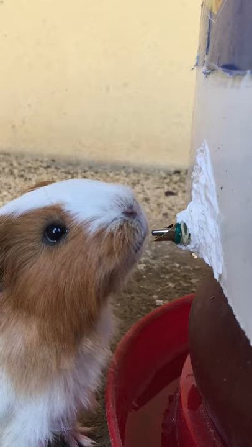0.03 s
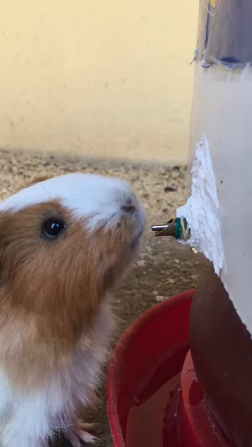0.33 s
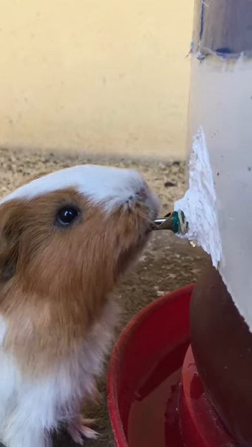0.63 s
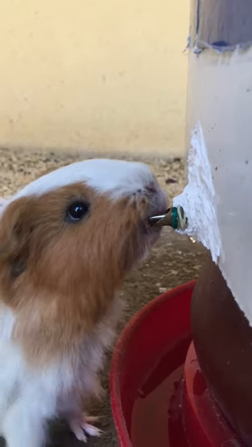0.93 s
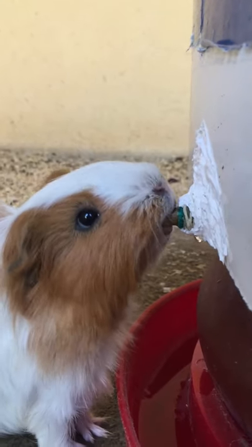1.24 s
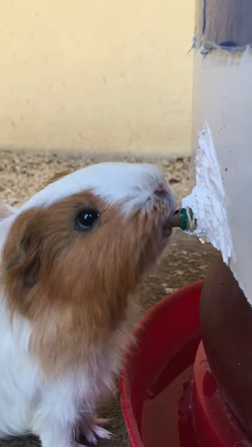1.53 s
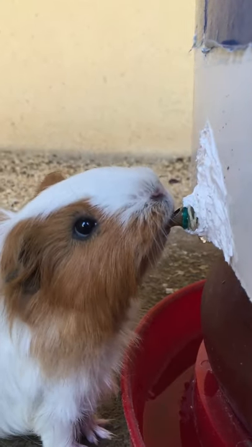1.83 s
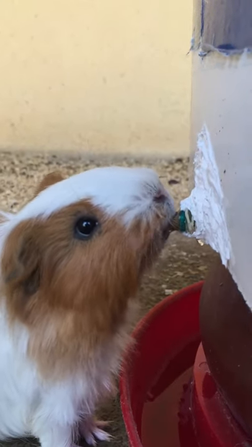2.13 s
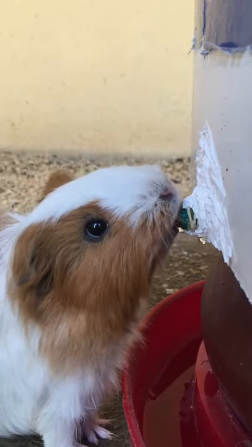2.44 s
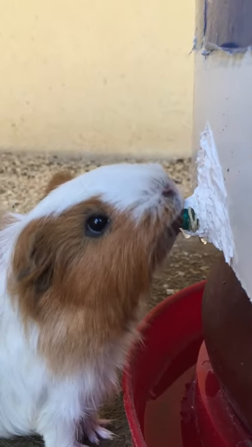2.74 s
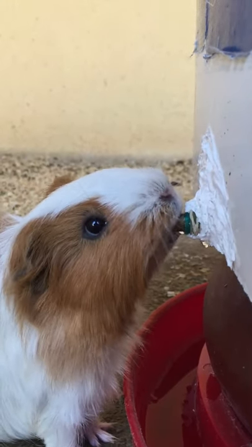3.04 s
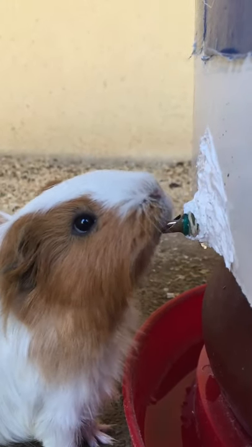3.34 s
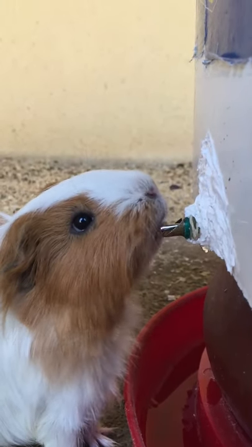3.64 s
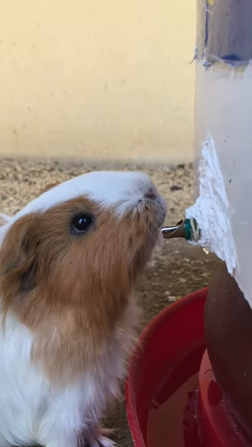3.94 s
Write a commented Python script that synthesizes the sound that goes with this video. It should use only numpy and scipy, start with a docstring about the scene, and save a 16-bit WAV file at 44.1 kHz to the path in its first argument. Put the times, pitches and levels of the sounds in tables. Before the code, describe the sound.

A guinea pig drinks from a metal nozzle, close up. For the first second there is only a low room rumble and wavering hum. From about 1.2 seconds come sharp, high clicks, roughly five a second, with faint wet lip smacks and thin, mostly rising squeaks. From 2 seconds, the plastic pipe thumps more strongly. The squeaks end near 3 seconds, the clicks at 3.4, and the rumble remains.

```python
"""A guinea pig drinks from a metal nozzle set in a plastic pipe, close to the microphone.
First a steady low rumble and a wavering drone sound alone. After a second, thin animal squeaks, mostly
rising, begin in the room, and the drinking starts: at each bite the valve pin strikes the nozzle with
a high click and the wet lips smack. From about two seconds on, harder bites drive the pipe's low mode
into stronger thumps. The squeaks end near three seconds, the bites soon after, and the rumble remains."""
import sys
import numpy as np
from scipy import signal
from scipy.fft import rfft, irfft
from scipy.io import wavfile
from scipy.ndimage import uniform_filter1d

SR = 44100
rng = np.random.default_rng(int(sys.argv[2]) if len(sys.argv) > 2 else 0)


def dump_mix(stems):
    """Bounce the given channels to the path in sys.argv[1] as a 16-bit WAV at rate SR."""
    frames = np.atleast_2d(stems).T  # one column per channel
    limited = np.clip(frames, -1, 1)  # hard clip at full scale
    pcm = np.round(limited * 32767).astype(np.int16)
    wavfile.write(sys.argv[1], SR, pcm)


N = 176400
CUTOFF_HZ = 16200

# Bites on the nozzle, each level relative within its column: time_s, thump_db, thump_hz, knock_db, smack_db
BITES = [(1.168, -41, 194, -50.5, -72), (1.353, -34.5, 203, -70, -63.5), (1.497, -54, 196, -49, -65),
         (1.856, -31.5, 213, -48, -77), (2.061, -29, 202, -49.5, -69), (2.286, -34.5, 208, -52, -74),
         (2.488, -34, 190, -53, -69), (2.684, -23, 198, -46.5, -68), (2.862, -25.5, 204, -53, -70),
         (3.045, -32, 192, -51.5, -73), (3.193, -33, 191, -61, -80), (3.247, -30.5, 206, -45.5, -65.5),
         (3.372, -32.5, 188.9, -51.5, -72)]


def valve_clicks():
    """Impact excitation: the pin strikes the nozzle and rattles, driving a damped ring and a broad tick."""
    # Pin impacts: start_s, level_db, ring_hz, half_width_hz, tick_db (against the ring)
    clicks = [(1.1583, -24.5, 12300, 3000, -2), (1.1657, -27.5, 8850, 2500, -10),
              (1.178, -34, 8500, 3500, -2), (1.3537, -19, 8740, 1200, -10), (1.3536, -27, 12500, 1400, -16),
              (1.3615, -36, 7800, 2500, -8), (1.498, -10.5, 12200, 1400, -11),
              (1.502, -20, 10300, 2200, -11), (1.677, -19, 14400, 2000, -5), (1.686, -21, 11900, 1500, -7),
              (1.859, -16, 12100, 1000, -22), (2.063, -25, 13600, 2000, -2), (2.069, -27, 13000, 3000, 2),
              (2.284, -24.5, 14900, 1800, -16), (2.487, 0, 14250, 1300, -34), (2.6771, -27, 9280, 2600, -7),
              (2.6841, -16, 9700, 1500, -10), (2.6882, -32, 9040, 3000, -8), (2.847, -30, 14600, 1400, -14),
              (2.859, -6.5, 9660, 1290, -10), (3.0376, -16, 14500, 1600, -17),
              (3.0433, -22, 10230, 1200, -6), (3.191, -20.5, 14800, 1700, -17),
              (3.1939, -32, 13000, 1400, -18), (3.2467, -24.5, 13960, 3010, -6),
              (3.276, -32, 14200, 2000, -12), (3.3667, -36, 11000, 3000, 1)]
    # Spectrum of the broad tick: frequency_hz, gain_db
    tick_spectrum = [(1000, -15), (2500, -22), (5000, -34), (7000, -6), (9500, -26), (12500, 1),
                     (15000, -3), (17000, -26)]
    rattle_decay_s, rattle_db = 0.0012, -8.5
    out, hz, t = np.zeros(N), np.fft.rfftfreq(1024, 1 / SR), np.arange(512) / SR
    for start_s, level_db, ring_hz, half_width_hz, tick_db in clicks:
        ring = 1 / (1 + ((hz - ring_hz) / half_width_hz) ** 2)
        tick = amp(tick_db + at_frequency(tick_spectrum, hz))
        contact = rng.standard_normal(len(t)) * np.exp(-t / rattle_decay_s) * (1 - np.exp(-t / 0.000074))
        contact *= amp(rattle_db) / np.linalg.norm(contact)
        contact[np.argmin(abs(t - .0002))] += 1  # the strike itself
        add(out, start_s, amp(level_db) * np.convolve(contact, minimum_phase(np.hypot(ring, tick))))
    return out + amp(-18) * reverberation(out)


def pipe_thumps():
    """Free damped vibration: after a bite the pipe's low mode thumps and its upper modes knock."""
    # Upper modes of the pipe: frequency_hz, gain_db, t60_s
    modes = [(408, -1.5, 0.046), (1060, 1, 0.082), (1280, -3, 0.015), (1646, 8.5, 0.013), (2204, -11, 0.12),
             (2790, -16.5, 0.01), (3700, -9, 0.019)]
    thump_rise_s, thump_t60_s = 0.004, 0.066
    out, t = np.zeros(N), np.arange(SR // 4) / SR
    for start_s, thump_db, thump_hz, knock_db, _ in BITES:
        envelope = (1 - np.exp(-t / thump_rise_s)) * amp(thump_db + 4.5 - 60 * t / thump_t60_s)
        sound = -np.sin(2 * np.pi * thump_hz * t) * envelope
        for mode_hz, gain_db, t60_s in modes:
            detuned_hz = mode_hz * (1 + 0.077 * rng.standard_normal())
            sound += amp(knock_db + gain_db - 60 * t / t60_s) * np.sin(2 * np.pi * detuned_hz * t)
        add(out, start_s, sound)
    return out + amp(-11.5) * reverberation(out)


def lip_smacks():
    """Shot noise: the wet lips give a fizz of tiny impulses that swells and fades around each bite."""
    # Spectrum of the fizz: frequency_hz, gain_db
    spectrum = [(2000, -20), (5000, -1), (8500, 5), (12000, 2), (16000, -20)]
    fade_s, grains_per_s = 0.019, 5000
    t, hz = np.arange(N) / SR, np.fft.rfftfreq(N, 1 / SR)
    envelope = sum(amp(smack_db) * np.exp(-abs(t - time_s) / fade_s) for time_s, *_, smack_db in BITES)
    grains = rng.standard_normal(N) * (rng.random(N) < grains_per_s / SR)
    return envelope * coloured(grains, amp(at_frequency(spectrum, hz)))


def squeaks():
    """Source and filter: the throat colours a whistle's overtones; hoarseness adds jitter and rasp."""
    # Calls: bright_db (overtone strength), then a contour of time_s, pitch_hz, level_db, roughness (0-1)
    calls = [ (-17, [(1.058, 2500, -56.5, 0.62), (1.095, 2850, -59.5, 0.26), (1.112, 2800, -69, 0.2)]),
             (-17, [(1.108, 2360, -55, 0.05), (1.12, 2480, -52, 0), (1.128, 2480, -70, 0.1),
             (1.147, 2430, -67, 0.14), (1.184, 2514, -60, .15)]), (-13, [(1.222, 3070, -54.5, 0.17),
             (1.25, 3373, -52, 0.04), (1.28, 3328, -49, 0), (1.312, 3263, -60, 0.2),
             (1.34, 3320, -72, 0.1)]), (-28, [(1.242, 6740, -66, 0.03), (1.258, 6800, -65, 0),
             (1.268, 6530, -78, 0.1), (1.276, 5900, -70, 0.15), (1.287, 5640, -69, 0.1)]),
             (-30, [(1.485, 1600, -52, 0.1), (1.515, 1652, -52, 0)]), (-8.5, [(1.535, 1896, -53, 0.15),
             (1.55, 2230, -52, 0.2), (1.562, 2495, -49, 0.1), (1.585, 2630, -62, 0.14),
             (1.605, 2610, -60, 0.2)]), (-8, [(1.595, 2980, -56, 0.05), (1.632, 3243, -38.5, 0.27),
             (1.66, 3630, -44, 0.7), (1.69, 3520, -75, 0.5)]), (-6, [(1.638, 4000, -48, 0.8),
             (1.656, 4500, -54, 0.15), (1.68, 4620, -54, 0.2), (1.693, 4760, -44.5, 0),
             (1.712, 4760, -42.5, 0.08), (1.725, 5130, -58, .02), (1.745, 5080, -49, 0.02),
             (1.765, 5130, -78, .03)]), (3, [(1.837, 2133, -51, 0.05), (1.856, 2110, -47.5, 0),
             (1.878, 2190, -46.5, 0.1), (1.897, 2293, -47.5, 0), (1.928, 2330, -48.5, 0.02),
             (1.942, 2444, -43.5, 0), (1.968, 2484, -42.5, 0.09), (1.995, 2633, -44, 0.13)]),
             (1, [(1.993, 2650, -44, 0.14), (2.01, 2823, -42.5, 0.6), (2.035, 2880, -50.5, 0.24),
             (2.052, 2912, -49.5, 0.15), (2.086, 2814, -55, 0.03)]), (-11, [(2.13, 1242, -52, 0.1),
             (2.18, 1632, -59, 0.84), (2.215, 2150, -55, 0.51), (2.23, 2420, -53.5, 0.15),
             (2.243, 2597, -60, 0.44), (2.258, 2950, -46, 0.32), (2.27, 2980, -64, 0.5)]),
             (-10, [(2.40, 2520, -63, 0.35), (2.435, 2298, -54, 0.42), (2.46, 2463, -69, 0.8),
             (2.485, 2920, -54.5, 0.24), (2.505, 3125, -67, 0.1)]), (-13, [(2.89, 1604, -67, 0.45),
             (2.95, 2054, -57, 0.5), (2.99, 2200, -64, 0.55)]), (-19, [(2.52, 3170, -64, 0.24),
             (2.57, 3084, -68.5, 0.63), (3.08, 2950, -72, 0.67)])]
    # Response of the throat: frequency_hz, gain_db
    throat = [(1300, 11), (2150, 4.5), (2550, 8.5), (3300, 12.5), (4300, -8.5), (4750, -15), (5200, -15),
              (6400, -16), (7450, -15), (8400, -15), (9000, -5.5), (9900, -7.5), (10500, -22), (11400, -15),
              (12400, -14), (13400, -23), (14200, -17), (14700, -33)]
    rasp_db, rasp_from_hz, tilt_db_per_octave = -14, 5000, -1
    out, f = np.zeros(N), np.fft.rfftfreq(N, 1 / SR)
    hiss = coloured(rng.standard_normal(N), amp(at_frequency(throat, f) / 2) * (f > rasp_from_hz))
    for bright_db, contour in calls:
        times, *columns = np.transpose(contour)
        t = np.arange(times[0], times[-1], 1 / SR)
        pitch_hz, level_db, roughness = (np.interp(t, times, column) for column in columns)
        jitter = (0.002 + 0.08 * roughness) * wander(len(t), hz=533)
        phase = 2 * np.pi * np.cumsum(pitch_hz * (1 + jitter)) / SR
        rasp = amp(bright_db + rasp_db) * np.sqrt(roughness) * hiss[round(t[0] * SR):][:len(t)]
        voice = np.sin(phase) + rasp
        for k in range(2, 8):
            throat_db = at_frequency(throat, k * pitch_hz) - at_frequency(throat, pitch_hz)
            overtone_db = bright_db + throat_db + tilt_db_per_octave * np.log2(k) + 5 * roughness
            # each overtone flutters in level and phase
            flutter = unit(1 + 0.7 * (wander(len(t), hz=80) + 1j * wander(len(t), hz=80)))
            overtone = (flutter * np.exp(1j * k * phase)).imag
            voice += (k * pitch_hz < CUTOFF_HZ) * amp(overtone_db) * overtone
        fades = np.clip(np.minimum(t - t[0], t[-1] - t) / 0.0041, 0, 1)
        shimmer = 1 + 0.5 * roughness * wander(len(t), hz=200)
        add(out, t[0], voice * fades * amp(level_db) * shimmer)
    return out + amp(-2.5) * reverberation(out)


def rumble():
    """Filtered noise: a bass-heavy spectrum, slightly uneven over time and frequency."""
    # Spectral shape of the rumble: frequency_hz, gain_db
    spectrum = [(15, -50), (25, -24), (43, -4), (77, -6.5), (96, -4), (168, -5.5), (187, -9.5), (222, -7.5),
                (255, -12), (328, -11.5), (434, -21), (513, -16.5), (624, -22), (897, -17.5), (1190, -19.5),
                (1810, -30), (3250, -40.5), (4940, -47.5), (6010, -48.5), (16000, -56)]
    level_db, patch_db = -44, 2.0
    cells = signal.stft(rng.standard_normal(N), SR, nperseg=1024, noverlap=768)[2]
    patches = uniform_filter1d(rng.standard_normal(cells.shape), size=5, axis=0)
    patches = unit(uniform_filter1d(patches, size=7, axis=1))
    noise = signal.istft(cells * amp(patch_db * patches), nperseg=1024, noverlap=768)[1][:N]
    return amp(level_db) * coloured(noise, amp(at_frequency(spectrum, np.fft.rfftfreq(N, 1 / SR))))


def drone():
    """Random frequency and amplitude modulation make a low sine tone waver."""
    # Course of the tone: time_s, pitch_hz, level_db
    contour = [(0, 84.2, -51), (.45, 88.84, -49.5), (.75, 84.75, -58), (1.0, 84.85, -44.5),
               (1.5, 83, -43.5), (1.8, 89.36, -47.5), (2.25, 90.25, -44), (2.55, 88.4, -55.5),
               (3.5, 89, -42), (4, 93.95, -48.5)]
    times, *columns = np.transpose(contour)
    pitch_hz, level_db = (np.interp(np.arange(N) / SR, times, column) for column in columns)
    phase = 2 * np.pi * np.cumsum(pitch_hz * (1 + 0.022 * wander(N, hz=10))) / SR
    return amp(level_db) * np.sin(phase) * (1 + 0.14 * wander(N, hz=26))


def reverberation(x):
    """Diffuse field: reflections from the walls decay exponentially, the treble first."""
    # Reverberation time of the room: frequency_hz, t60_s
    decay_times = [(200, 0.36), (2500, 0.23), (5000, 0.13), (10000, 0.14), (16000, 0.088)]
    hz, t, cells = signal.stft(rng.standard_normal(SR // 2), SR, nperseg=256)
    decay = amp(-60 * t / at_frequency(decay_times, hz)[:, None])
    tail = signal.istft(cells * decay, SR, nperseg=256)[1]
    tail *= np.minimum(np.arange(len(tail)) / SR / 0.0039, 1)  # builds up over 3.9 ms
    return signal.fftconvolve(x, tail / np.linalg.norm(tail))[:N]


def amp(db):
    """Decibels to amplitude ratio."""
    return 10 ** (np.asarray(db) / 20)


def unit(x):
    """Normalisation to rms 1."""
    return x / np.sqrt(np.mean(abs(x) ** 2) + 1e-20)


def at_frequency(points, hz):
    """Interpolation on a log-frequency axis."""
    f, value = np.transpose(points)
    return np.interp(np.log(hz + 1), np.log(f), value)


def coloured(x, gain):
    """Spectral filtering, normalised to rms 1."""
    return unit(irfft(rfft(x) * gain, len(x)))


def add(mix, start_s, sound):
    """Superposition of a sound from start_s on."""
    part = mix[round(start_s * SR):][:len(sound)]
    part += sound[:len(part)]


def wander(size, hz):
    """Low-pass noise: random motion of rms about 1, mostly slower than hz."""
    span = max(size, SR // 2)
    f = np.fft.rfftfreq(span, 1 / SR)
    return coloured(rng.standard_normal(span), 1 / (1 + (f / hz) ** 4))[:size]


def minimum_phase(gain):
    """Minimum phase gives the sharpest impulse response with this spectrum."""
    log_gain = np.log(np.r_[gain, gain[-2:0:-1]] + 1e-7)
    return np.fft.ifft(np.exp(np.conj(signal.hilbert(log_gain)))).real


def scene():
    """Superposition: all sources add at one microphone."""
    return (valve_clicks() + lip_smacks() + pipe_thumps() + squeaks() + rumble() + drone())[None]


def record(dry):
    """Gating and band limiting: a moment of silence, then the sound through a steep low-pass filter."""
    gate = np.arange(N) / SR >= 0.084
    low_pass = signal.firwin(255, CUTOFF_HZ, window=("kaiser", 8), fs=SR)
    return signal.oaconvolve(dry * gate, low_pass[None], "same")


dry = scene()
out = record(dry)
dump_mix(out)
```